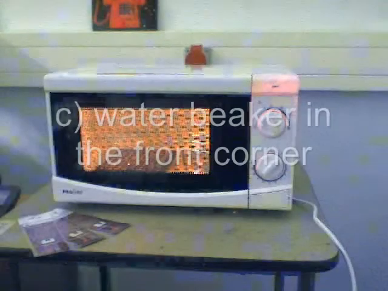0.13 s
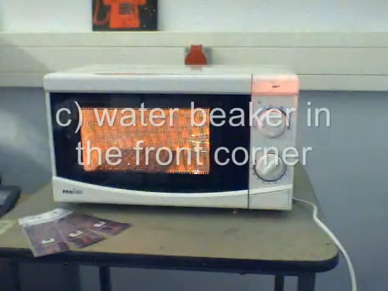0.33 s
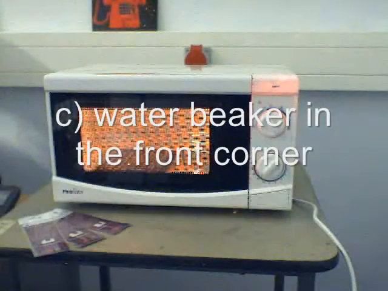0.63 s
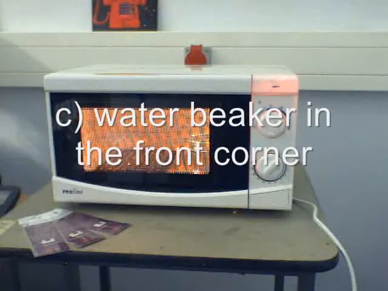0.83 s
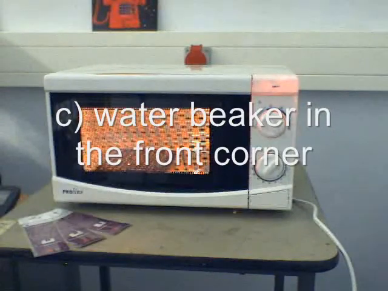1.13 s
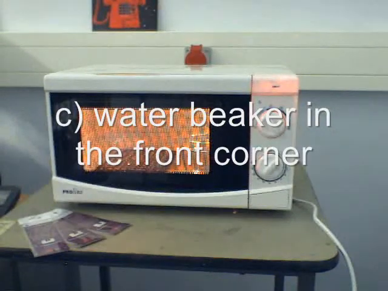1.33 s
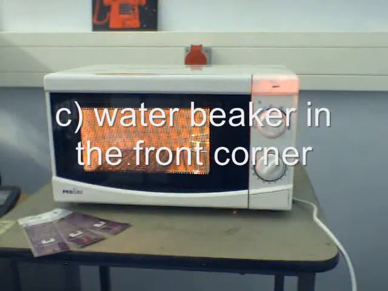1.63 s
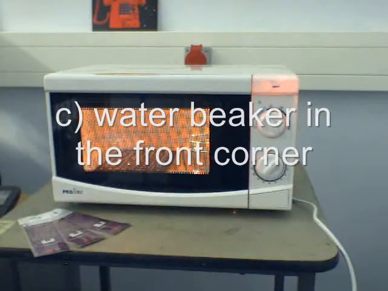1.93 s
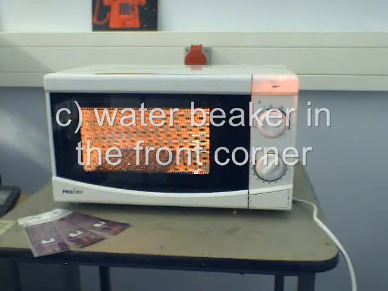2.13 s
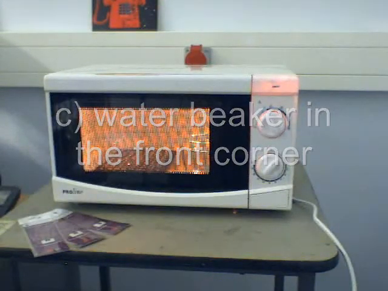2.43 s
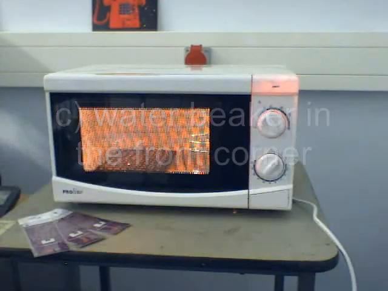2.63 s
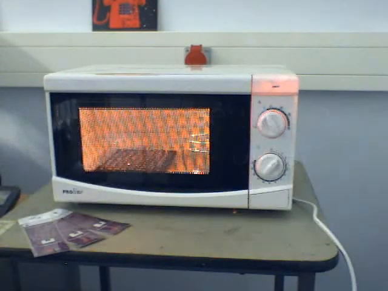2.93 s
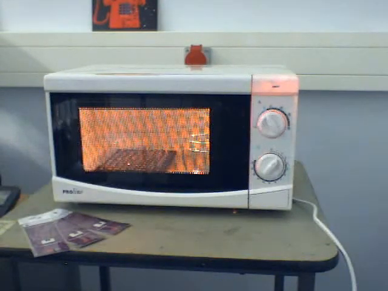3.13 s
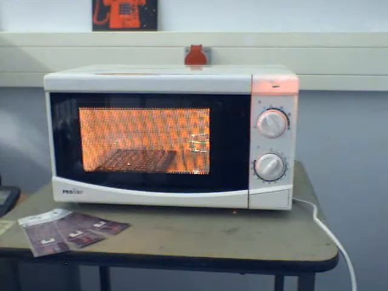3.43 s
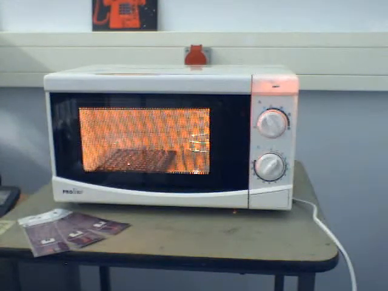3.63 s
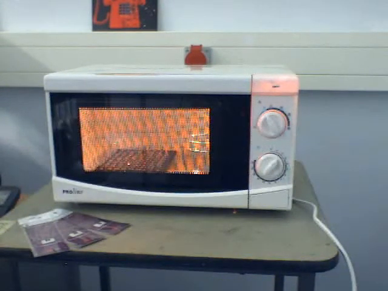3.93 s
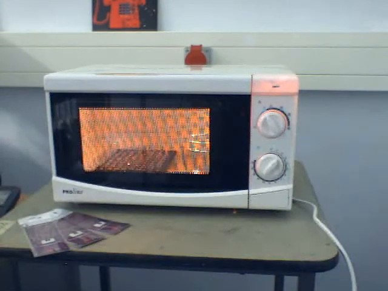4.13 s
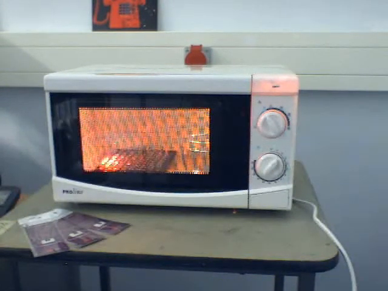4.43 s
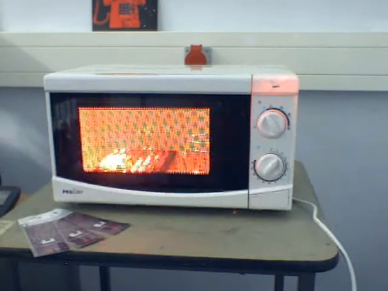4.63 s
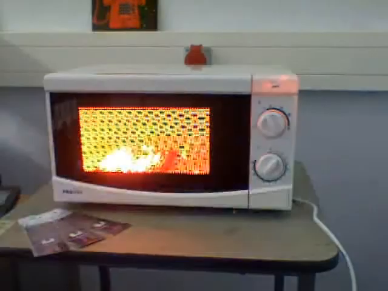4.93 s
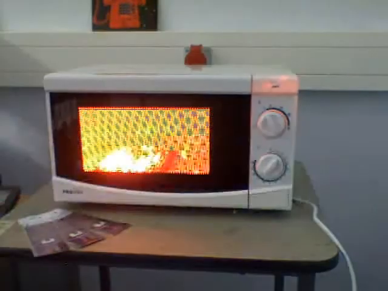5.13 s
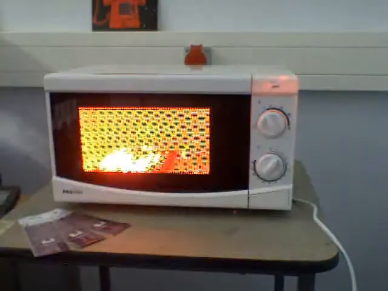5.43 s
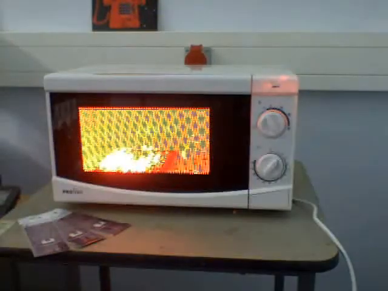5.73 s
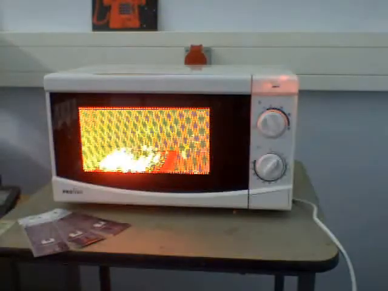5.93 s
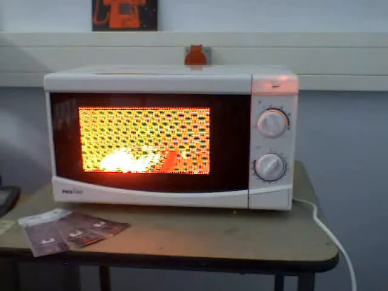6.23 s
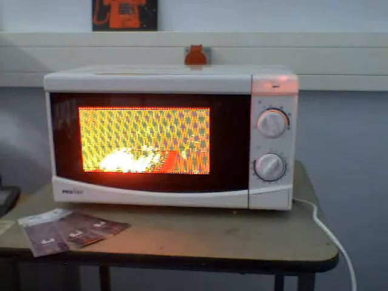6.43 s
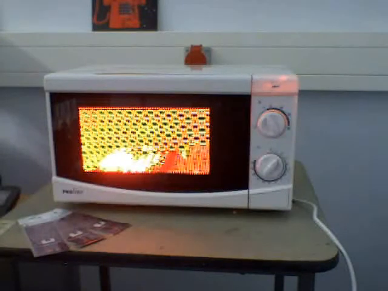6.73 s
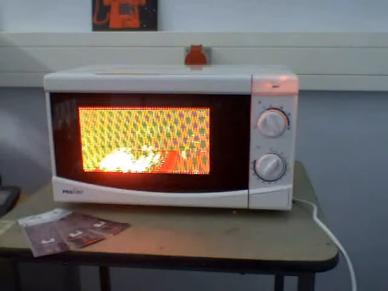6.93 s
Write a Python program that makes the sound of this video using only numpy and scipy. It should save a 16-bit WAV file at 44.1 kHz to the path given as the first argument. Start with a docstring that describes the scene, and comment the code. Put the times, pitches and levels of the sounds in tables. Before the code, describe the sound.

Steady whirring and rushing air from a running microwave oven, with one sharp click followed by a slightly wavering hum.

```python
"""A microwave oven on a table in a small room, about a metre from a camera's microphone.
From the start the fan drones and blows through the vents, and the camera's electronics whine faintly.
Near 2 s a switch clicks and the magnetron comes on: the transformer hums and the fan slows a little.
From about 4.5 s a plasma grows in the cavity; the changed load recolours the hum and slows the fan again."""
import sys
import numpy as np
from scipy import signal
from scipy.fft import rfft, irfft
from scipy.io import wavfile

SR = 44100
rng = np.random.default_rng(int(sys.argv[2]) if len(sys.argv) > 2 else 0)


def int16_out(signal):
    """Quantize to a 16-bit WAV file."""
    q = np.round(np.clip(np.atleast_2d(signal).T, -1, 1) * 32767)
    wavfile.write(sys.argv[1], SR, q.astype(np.int16))


N = 312669
T = np.arange(N) / SR
FREQS = np.maximum(np.arange(N // 2 + 1) * SR / N, 1)
MAINS_HZ = 49.98
MAGNETRON_ON_S, PLASMA_ON_S = 1.975, 4.45


def undb(db):
    """Decibels to gain."""
    return 10 ** (np.asarray(db) / 20)


def colour(points):
    """Gain at every frequency from (frequency [Hz], level [dB]) points; silent above the last."""
    hz, db = np.transpose(points)
    return undb(np.interp(np.log(FREQS), np.log(hz), db, right=-np.inf))


def noise(gain):
    """Noise with the given amplitude per root Hz."""
    return irfft(rfft(rng.standard_normal(N)) * gain, N) * np.sqrt(SR / 2)


def wander(rate_hz):
    """A smooth random curve of spread 1, changing about rate_hz times a second."""
    curve = irfft(rfft(rng.standard_normal(N)) * np.exp(-(FREQS / rate_hz) ** 2), N)
    return (curve - curve.mean()) / curve.std()


def tone(cycles, db):
    """A sine of the given rms level that follows a phase counted in cycles."""
    return np.sqrt(2) * undb(db) * np.sin(2 * np.pi * (cycles + rng.random()))


def settle(start_s, lag_s):
    """A rise from 0 towards 1 that begins at start_s and follows with a lag."""
    return 1 - np.exp(-np.maximum(T - start_s, 0) / lag_s)


# Tones of the four-bladed fan: (multiple of shaft rate, level at full speed [dB], level at slowest [dB])
FAN_HARMONICS = [(4, -44, -45.5), (6, -60, -59.5), (7, -61, -58), (8, -43, -51), (12, -51.5, -58.5),
                 (16, -54, -62), (18, -58.5, -65), (24, -63.5, -64)]

def fan(free_hz=40.35, sag_hz=0.19, lag_s=0.35, sway_turns=0.0038):
    """Blade and rotor tones, shaken by uneven inflow; magnetron and plasma each slow the motor."""
    magnetron, plasma = settle(MAGNETRON_ON_S, lag_s), settle(PLASMA_ON_S, lag_s)
    shaft_hz = free_hz - sag_hz * (magnetron + plasma)
    turns = np.cumsum(shaft_hz) / SR + sway_turns * wander(1.9)
    strain = 0.59 * magnetron + 0.41 * plasma
    flutter_db = 1.65 + 1.1 * strain
    blades = 0
    for multiple, fast_db, slow_db in FAN_HARMONICS:
        db = fast_db + strain * (slow_db - fast_db) + flutter_db * wander(2.5)
        blades += tone(multiple * turns, db)
    # the rotor's slots beat with the motor's pulsing field
    slot_cycles = 18 * turns + 2 * MAINS_HZ * T
    return blades + tone(slot_cycles, db=-58.5 - 2 * strain + flutter_db * wander(2.8))


# Air rushing through the vents: (frequency [Hz], level [dB per Hz])
VENT_SPECTRUM = [(20, -80), (60, -70.5), (90, -79.5), (280, -73), (420, -76), (580, -70), (920, -77),
                 (1100, -87), (1500, -94.5), (4300, -97.5), (5300, -106), (6000, -99), (6900, -99),
                 (7700, -116)]
# Resonances of the case and duct: (frequency [Hz], width [Hz], peak level [dB per Hz])
CASE_RESONANCES = [(134.2, 27, -62.5), (178, 26, -66.5), (205.6, 14, -68.5), (341.5, 22, -61),
                   (448.2, 5.3, -62.5), (522, 84, -66.5), (723, 20, -68), (1975, 91, -93.5),
                   (2870, 250, -88.5), (3076, 85, -87), (4720, 404, -91.5), (4850, 67, -85.5)]

def vent_air(flicker_db=0.33):
    """Turbulence hisses through the vents and rings the case."""
    power = colour(VENT_SPECTRUM) ** 2
    for hz, width_hz, db in CASE_RESONANCES:
        detuning = (FREQS - hz) / (0.67 * width_hz)
        power += (undb(db) / (1 + detuning ** 2)) ** 2
    return noise(np.sqrt(power)) * undb(flicker_db * wander(4.9))


# Steady whistles of the camera's electronics: (frequency [Hz], level [dB])
STEADY_WHISTLES = [(8269, -85), (9647, -83), (11025, -80), (12403, -95), (13781, -96), (15159, -97)]
# One whistle that hops to a higher pitch: (start [s], end [s], frequency [Hz], level [dB])
HOPPING_WHISTLE = [(0, .363, 7289, -75), (.363, 7.1, 9721.5, -73.5)]
# Self-noise of the microphone: (frequency [Hz], level [dB per Hz])
MIC_HISS = [(20, -108), (7500, -108), (10000, -114), (12300, -115), (12600, -127), (16000, -128)]

def electronics():
    """The camera's circuits whistle thinly over the microphone's hiss."""
    steady = sum(tone(hz * T, db) for hz, db in STEADY_WHISTLES)
    hopping = sum(tone(hz * T, db) * ((T >= start) & (T < end)) for start, end, hz, db in HOPPING_WHISTLE)
    return steady + hopping + noise(colour(MIC_HISS))


# The switch contact and its bounces: (time [s], gain [dB], extra gain of the crack [dB])
SWITCH_CONTACTS = [(1.9642, -1, -0.5), (1.9688, -4, -1.5), (1.980, -9, -5), (2.05, -12, -8)]
# Crack of the contact: (frequency [Hz], relative level [dB per Hz])
CRACK_SPECTRUM = [(300, -66), (1100, -61), (1600, -68.5), (2400, -66.5), (3700, -73.5), (4800, -67),
                  (5400, -78), (6400, -61.5), (7200, -71.5), (9200, -77.5), (10600, -97), (12000, -87),
                  (14400, -96), (15000, -120)]
# Ring of the switch and panel: (frequency [Hz], relative level [dB], time to fall 60 dB [s])
PANEL_MODES = [(608, -43.5, 0.27), (1060, -45, 0.17), (1170, -40, 0.19), (2400, -50, 0.16),
               (2860, -51.5, 0.099), (3010, -42.5, 0.067), (3418, -49.5, 0.19), (4300, -44, 0.067),
               (4870, -43, 0.076), (6440, -43, 0.045), (6750, -37, 0.055)]

def switch_click(rise_s=0.0015, crack_t60=0.049, ring_db=-2, room_db=-13, room_t60=0.47):
    """A switch snaps and bounces: short cracks, a ringing panel, then the small room's duller tail."""
    direct = 0
    for start, db, crack_db in SWITCH_CONTACTS:
        age = np.maximum(T - start, 0)
        attack = np.minimum(age / rise_s, 1)
        crack = noise(colour(CRACK_SPECTRUM)) * undb(crack_db - 60 * age / crack_t60)
        ring = sum(tone(hz * age, mode_db - 60 * age / t60) for hz, mode_db, t60 in PANEL_MODES)
        direct += undb(db) * attack * (crack + undb(ring_db) * ring)
    room_age = np.maximum(T - SWITCH_CONTACTS[0][0], 0)
    room_spectrum = colour(CRACK_SPECTRUM) / np.hypot(1, (FREQS / 7000) ** 2)
    room_envelope = np.minimum(room_age / 0.0058, 1) * undb(room_db - 60 * room_age / room_t60)
    return direct + noise(room_spectrum) * room_envelope


# Transformer hum: (multiple of twice the mains rate, plain-load level [dB], full-plasma level [dB])
HUM_HARMONICS = [(1, -48.5, -46), (2, -54, -53.5), (3, -60, -79), (4, -48.5, -55), (5, -41, -49.5),
                 (6, -63, -60), (7, -54, -57), (8, -58, -68), (9, -65.5, -58.5), (10, -66, -87)]

def transformer_hum(warming_db_per_s=-0.5, plasma_share=0.7, waver_db=0.86, flicker_db=2.5):
    """The powered core flexes twice a mains cycle; the plasma recolours the hum and makes it flicker."""
    drive = settle(MAGNETRON_ON_S, lag_s=0.069) * undb(warming_db_per_s * (T - MAGNETRON_ON_S))
    plasma = plasma_share * settle(PLASMA_ON_S, lag_s=0.64)
    swell_db = 1.5 * np.cos(2 * np.pi * (T - 2.75) / 1.49)
    hum = 0
    for multiple, plain_db, plasma_db in HUM_HARMONICS:
        shift_db = plasma * (plasma_db - plain_db + flicker_db * wander(4))
        gain = drive * undb(plain_db + shift_db + waver_db * wander(1.8))
        if multiple == 1:  # the fan motor keeps the lowest note going throughout
            gain = np.maximum(gain, undb(-58))
        if multiple == 5:  # the loudest overtone slowly swells and sinks
            gain *= undb(swell_db)
        hum += gain * tone(multiple * 2 * MAINS_HZ * T, db=0)
    return hum


def scene():
    """The oven from a metre away, with the camera's own noise, in mono."""
    oven = fan() + vent_air() + transformer_hum() + switch_click()
    return (oven + electronics())[None]


def record(dry, low_hz=24, top_hz=15650):
    """The camera cuts the deepest bass and the highest treble from its microphone."""
    low_cut = signal.butter(6, low_hz, "high", fs=SR, output="sos")
    high_cut = signal.ellip(8, 0.2, 70, top_hz, fs=SR, output="sos")
    return signal.sosfilt(high_cut, signal.sosfilt(low_cut, dry))


dry = scene()
out = record(dry)
int16_out(out)
```